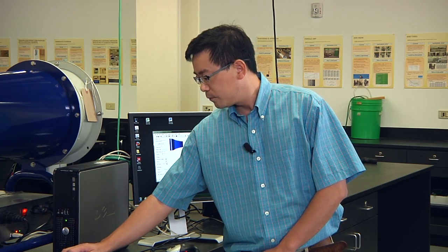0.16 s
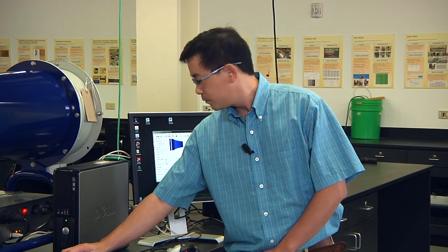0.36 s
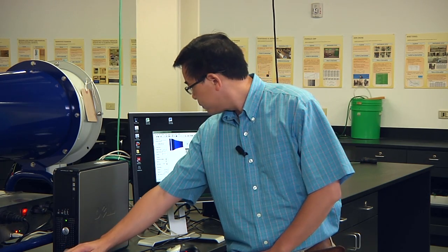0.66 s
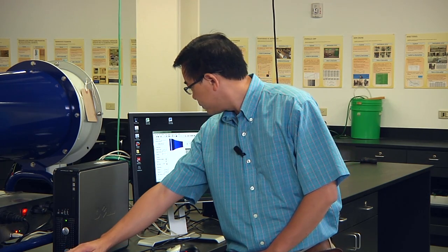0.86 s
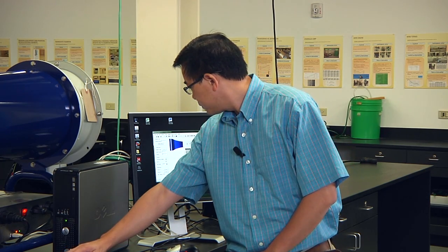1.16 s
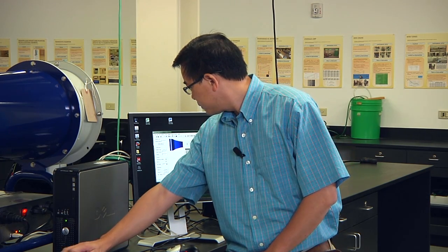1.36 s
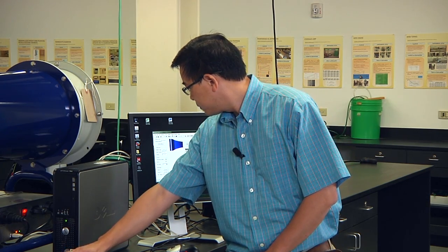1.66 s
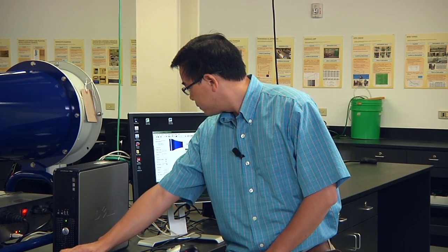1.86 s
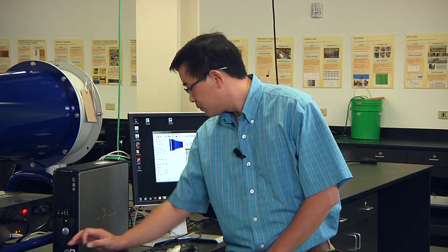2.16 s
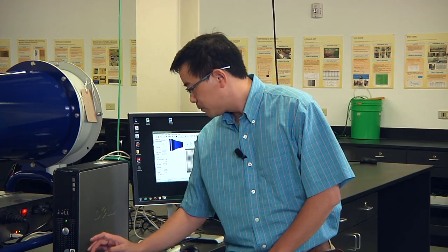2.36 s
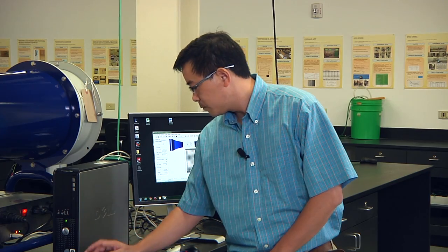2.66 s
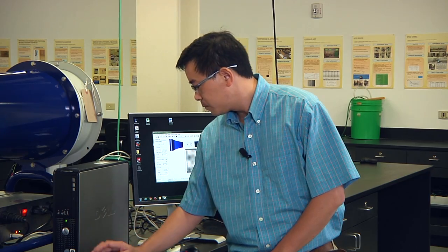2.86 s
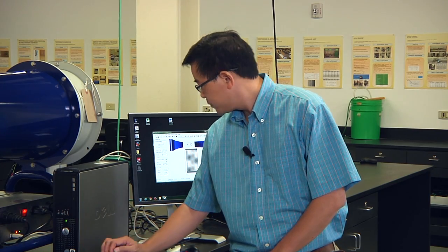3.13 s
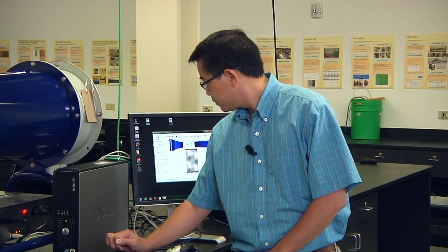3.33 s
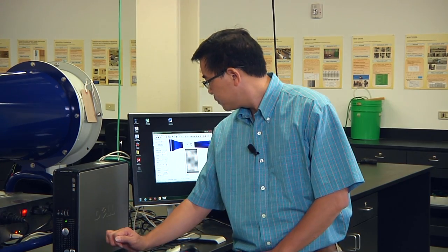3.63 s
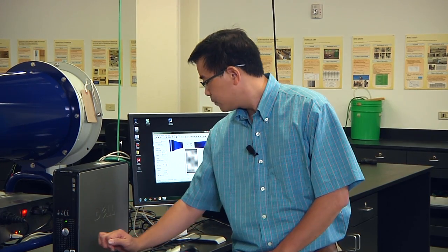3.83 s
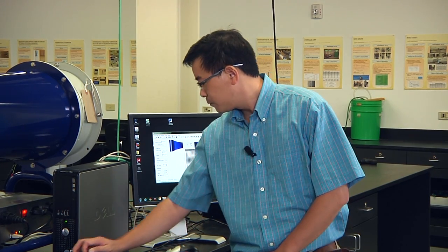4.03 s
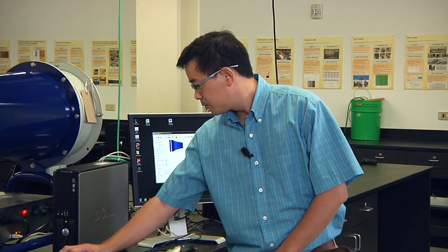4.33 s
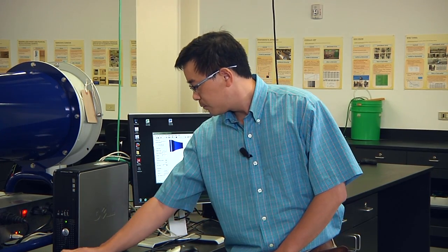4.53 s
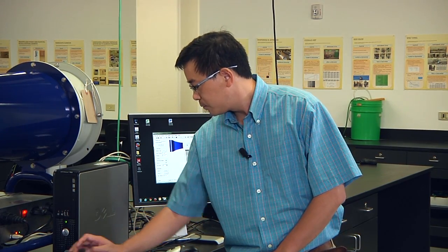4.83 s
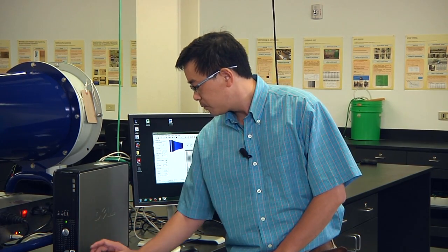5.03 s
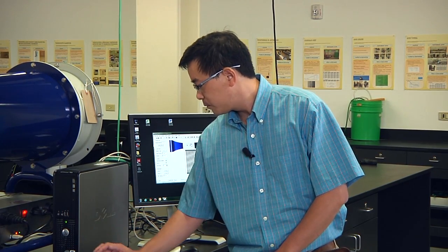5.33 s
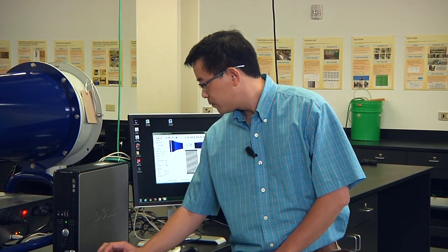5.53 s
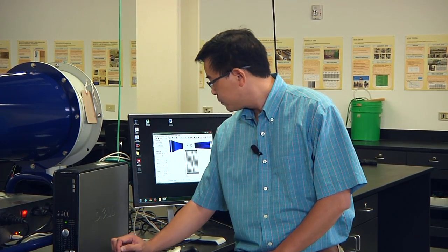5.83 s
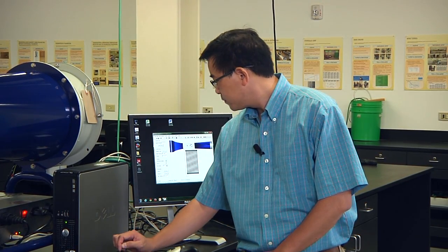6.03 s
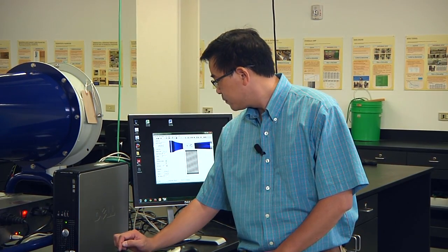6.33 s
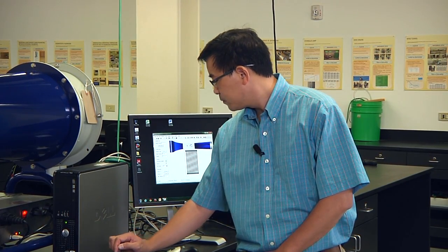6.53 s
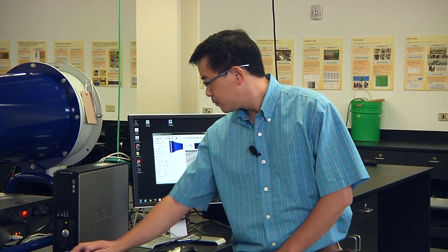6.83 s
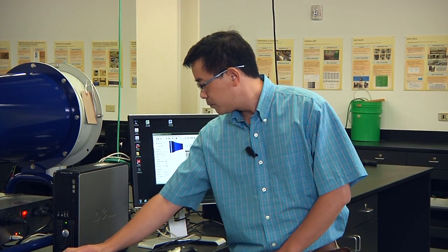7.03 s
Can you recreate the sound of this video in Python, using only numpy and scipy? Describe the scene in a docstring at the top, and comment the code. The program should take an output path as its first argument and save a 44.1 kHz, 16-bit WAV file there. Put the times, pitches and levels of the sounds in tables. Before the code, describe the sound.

A wind tunnel fan is already running fast in a laboratory, with rushing air, a low roar and a thin motor whine. From the start the whine glides downward and the rush eases until about 3.5 seconds. A low, throbbing boom in the duct swells around 2.5 to 3 seconds. The fan picks up slightly from 3.5 to 4 seconds, holds until 5, then winds down, booming again around 5.4 seconds. From about 6.2 seconds the motor moans faintly as the airflow fades toward steady room rumble, ending just after 7 seconds. A very faint, high electrical whistle persists throughout, shifting pitch occasionally. At the desk, a computer mouse wheel ticks in short runs at about 1.6 and 1.9 seconds, followed by four light plastic clicks between 2.8 and 3. More scrolling comes at 4.5 to 4.8 seconds, then three clicks around 5.3 to 5.5.

```python
"""A laboratory wind tunnel fan slows from high speed, picks up a little, then winds down.
Its turbulent air rushes and booms in two low duct resonances. Blade tones and motor whine follow
the shaft; the inverter whistles high above, and the slowing motor moans near the end.
At the desk a computer mouse clicks and scrolls, each snap ringing its shell, over steady room air."""
import sys
import numpy as np
from scipy import signal
from scipy.fft import rfft, irfft, next_fast_len
from scipy.io import wavfile
from scipy.ndimage import uniform_filter1d

SR = 44100
rng = np.random.default_rng(int(sys.argv[2]) if len(sys.argv) > 2 else 0)


def generate_wav(sig):
    """Save sig (samples, or channels by samples) to the path in sys.argv[1] as 16-bit PCM at SR."""
    pcm = np.round(np.clip(np.atleast_2d(sig).T, -1, 1) * 32767).astype(np.int16)
    wavfile.write(sys.argv[1], SR, pcm)


N = 317079
TIME_S = np.arange(N) / SR
SLOTS, BLADES, CRUISE_WHINE_HZ = 72, 4, 1660
FAST_HZ, SLOW_HZ, LOW_HZ = 14922, 14013, 7020  # inverter switching

# Growth with fan speed: cruise_gain_db, db_per_octave
RUSH_LAW, ROAR_LAW, HISS_LAW = (-48.5, 18), (-41, 19.7), (-64.5, 18.9)
DRONE_LAW, WHINE_LAW = (-41, 24.5), (-47, 11.8)

# Motor whine, SLOTS times the shaft rate: time_s, pitch_hz
WHINE_PITCH = [(0, 2635), (.25, 2570), (.45, 2430), (.92, 2275), (1.15, 2230), (1.42, 2105), (2.3, 1850),
               (3, 1595), (3.5, 1480), (4.1, 1658), (5.05, 1662), (5.4, 1600), (5.7, 1490), (6, 1345),
               (6.5, 1175), (7.19, 1010)]
# Fan tones: shaft_multiple, gain_db
FAN_TONES = [(4, 2), (7, 3.5)]
# Duct modes carrying the fan tones: centre_hz, width_hz, gain_per_pass_db
DUCT_MODES = [(111, 38, 1), (163.8, 5.7, 1.5), (231, 35, 0)]
# Whine partials: harmonic, gain_db
WHINE_PARTIALS = [(1, 6), (2, -1.5), (3, -5), (4, -11), (5, -11.5)]
# Motor housing modes: centre_hz, width_hz, gain_db
HOUSING_MODES = [(1647, 50, -26.5), (2396, 46, -26.5), (2630, 38, -30), (3230, 120, -46), (3700, 77, -34),
                 (4560, 160, -26), (5200, 120, -30), (5830, 250, -22.5), (6340, 160, -29), (6750, 150, -35),
                 (7230, 100, -26), (7770, 110, -27.5), (8400, 120, -29), (9015, 50, -26), (9800, 120, -23),
                 (10900, 200, -24), (11950, 100, -30)]
# Mid-band air rush: frequency_hz, relative_density_db
RUSH_SPECTRUM = [(240, -27), (400, -3.5), (450, -5.5), (560, -6.5), (690, -2), (800, -5.5), (1000, -8),
                 (1200, -10.5), (1450, -9.5), (1700, -14), (2000, -17), (2400, -24.5), (3200, -38.5),
                 (4500, -75)]
# Low air roar: frequency_hz, relative_density_db
ROAR_SPECTRUM = [(15, -44), (28, -15), (37, -3), (50, -28), (65, -19), (85, -0.5), (108, 3.5), (128, -8),
                 (150, 5), (178, -3.5), (195, -0.5), (230, 1), (265, -0.5), (300, -11.5), (380, -9.5),
                 (470, -26), (700, -50)]
# High air hiss: frequency_hz, relative_density_db
HISS_SPECTRUM = [(1200, -25), (2000, -1), (2600, 4.5), (3300, 1.5), (4000, -2.5), (4800, -0.5), (6000, -5),
                 (8500, -10), (9900, -6), (11500, -20), (15500, -24)]
# Tunnel wall rings: pitch_hz, width_hz, gain_db
WALL_MODES = [(318.4, 6.7, -11.5), (349.6, 15, -12), (690, 25.4, -7), (1090, 22, -14), (1238, 30, -18.5),
              (1451, 39, -15.5), (1626, 15, -22)]
# Slow boom envelope, highest with the blade tone near: time_s, gain_db
BOOM_ENVELOPE = [(0, -22), (.3, -5), (1.3, -7), (2.1, -4), (2.75, 4.5), (2.97, -4.5), (3.3, -1.5),
                 (3.85, -6), (3.93, 1), (4.87, 0.5), (5.08, -4.5), (5.3, 2.5), (5.65, -2.5), (5.83, -11),
                 (6.02, -9.5), (7.19, -23)]
# Boom flares, slowing blade tone close by: centre_s, length_s, gain_db
BOOM_FLARES = [(2.453, 0.1, 2.5), (2.813, 0.14, 6.5), (5.41, 0.11, 5), (5.603, 0.091, 6)]
# Inverter whistles: start_s, end_s, switching_hz, start_gain_db, end_gain_db, fuzz_db
WHISTLES = [(0, 1.3, FAST_HZ, -78, -86, -5), (1.3, 3.3, FAST_HZ, -87, -84, 0),
            (3.3, 3.98, FAST_HZ, -77, -77, 1), (3.98, 4.3, FAST_HZ, -85, -88, 4),
            (4.3, 4.93, SLOW_HZ, -85, -84, 4), (4.9, 6.08, FAST_HZ, -88, -85, 3),
            (6.09, 7.3, SLOW_HZ, -74, -81, 1), (6.09, 7.3, LOW_HZ, -81, -97, 11)]
# Sidebands of the switching tone: offset_shaft_multiple, gain_db
SIDEBANDS = [(7.2, -10), (14.4, -15), (22, -17), (28, -8)]
# Motor moans: start_s, end_s, pitch_hz, gain_db
MOANS = [(6.237, 6.482, 416, -46.5), (6.25, 6.75, 383.4, -54), (6.45, 7.055, 410, -58.5),
         (7.02, 7.225, 418, -56)]
# Button clicks: start_s, snap_peak_db, body_gain_db, treble_gain_db
CLICKS = [(2.7876, -45, 2, -1), (2.8362, -53, 2, -10), (2.8744, -49.5, -2, -15), (3.0022, -40.5, -3.5, 1),
          (5.267, -44, -3, -29), (5.3595, -48, -6, -19), (5.4792, -43, -8.5, 2)]
# Scroll wheel strokes: start_s, end_s, gain_db
SCROLLS = [(1.584, 1.70, -41.5), (1.869, 1.95, -46.5), (4.52, 4.61, -42.5), (4.665, 4.78, -43.5)]
# Plastic mouse shell modes: pitch_hz, gain_db, t60_s
SHELL_MODES = [(3170, -3, 0.035), (3720, 7, 0.012), (4520, 0, 0.035), (5500, 3.5, 0.013),
               (6640, -14.5, 0.014), (7640, -5, .012), (8680, -3, 0.027)]
# Room air: frequency_hz, relative_density_db
ROOM_SPECTRUM = [(18, 7), (28, 26), (37, 36.5), (50, 27.5), (72, 39), (110, 16.5), (400, 19.5),
                 (1000, 11.5), (1450, 12), (2100, -25), (3000, -10), (4200, -8.5), (4900, -4), (5280, 6),
                 (5700, -5), (8500, -9), (10000, -5), (10700, -5), (11400, -8.5), (15500, -10)]


def fan():
    """Blade tones and motor slot whine, locked to the shaft, glide through duct and housing modes."""
    whine_hz = curve(WHINE_PITCH)
    shaft_hz = whine_hz / SLOTS
    blades, whine = np.zeros(N), np.zeros(N)
    for multiple, db in FAN_TONES:
        hz = multiple * shaft_hz
        duct_gain = mode_gain(DUCT_MODES, hz) ** 2  # two passes: steep flanks
        blades += amp(db) * duct_gain * tone(hz, 0.88 + 0.54 * flutter(2.35))
    for harmonic, db in WHINE_PARTIALS:
        hz = harmonic * whine_hz
        whine += amp(db) * mode_gain(HOUSING_MODES, hz) * tone(hz, 0.45 + 1.3 * flutter(49))
    return speed_gain(RUSH_LAW) * blades + speed_gain(WHINE_LAW) * whine


def airflow():
    """Tunnel turbulence: rush with the wall ringing in it, roar and hiss."""
    wall = sum(amp(db) * tone(hz, flutter(width_hz)) for hz, width_hz, db in WALL_MODES)
    rush = speed_gain(RUSH_LAW) * (amp(-0.5) * noise(RUSH_SPECTRUM) + wall)
    roar = speed_gain(ROAR_LAW) * noise(ROAR_SPECTRUM)
    hiss = speed_gain(HISS_LAW) * noise(HISS_SPECTRUM)
    return rush + roar + hiss


def duct(boom_hz=95.6, drone_hz=162.8, pull_share=0.65, pull_range_hz=23.2):
    """Two duct resonances throb in the flow; a nearby blade tone pulls the lower one's pitch."""
    offset_hz = BLADES * curve(WHINE_PITCH) / SLOTS - boom_hz
    pulled_hz = boom_hz + pull_share * offset_hz * np.exp(-(offset_hz / pull_range_hz) ** 2)
    strength = throb(depth=0.65, rate_hz=15.6)
    for centre_s, length_s, db in BOOM_FLARES:
        age = (TIME_S - centre_s) / length_s
        flare = (amp(db) - 1) * np.exp(-(2 * age) ** 2)
        sag_db = -2.5 * np.exp(-(3.2 * (age - 0.83)) ** 2)  # boom falls out of step with the blades
        strength = (strength + flare) * amp(sag_db)
    boom = strength * resonance(pulled_hz, jitter_hz=4, roughness=0.17)
    drone = resonance(drone_hz, jitter_hz=5.5, roughness=0.22) * throb(depth=0.8, rate_hz=15.8)
    return amp(-30.5 + curve(BOOM_ENVELOPE)) * boom + speed_gain(DRONE_LAW) * drone


def resonance(hz, jitter_hz, roughness):
    """Self-sustained resonance; turbulence jostles its pitch and, slightly, its strength."""
    jostled_hz = hz + jitter_hz * flutter(23).real
    waver = 1 + roughness * flutter(2 * jitter_hz)
    return tone(jostled_hz, waver) / np.sqrt(1 + roughness ** 2)


def inverter(fade_s=0.053):
    """The motor drive hops between switching frequencies; sidebands close in as the shaft slows."""
    out = np.zeros(N)
    shaft_hz = curve(WHINE_PITCH) / SLOTS
    sidebands = sum(np.sqrt(2) * amp(db + 1) * tone(multiple * shaft_hz, 0.8 + 0.6 * flutter(15))
                    for multiple, db in SIDEBANDS)
    for start_s, end_s, hz, start_db, end_db, fuzz_db in WHISTLES:
        gate = np.clip(np.minimum(TIME_S - start_s, end_s - TIME_S) / fade_s + 0.5, 0, 1)
        gain = amp(np.interp(TIME_S, [start_s, end_s], [start_db, end_db]))
        waver = 0.67 + 0.88 * flutter(35) + amp(fuzz_db) * flutter(380)
        out += gate * gain * tone(hz, waver + sidebands)
    return amp(3) * out


def motor_moans():
    """The motor housing sounds briefly as the speed falls."""
    out = np.zeros(N)
    for start_s, end_s, hz, db in MOANS:
        swell = np.sin(np.pi * np.clip((TIME_S - start_s) / (end_s - start_s), 0, 1))
        out += amp(db) * swell * tone(hz, 0.71 + 0.4 * flutter(48))
    return out


def mouse(rebound_s=0.0089, notch_gap_s=0.025, jitter_s=0.005, spread_db=2):
    """Buttons ring the hollow body and rebound more weakly; wheel notches tick in short runs."""
    out = np.zeros(N)
    t = np.arange(SR // 10) / SR
    body = amp(-60 * t / 0.048) * (np.sin(2 * np.pi * 1750 * t) + 0.61 * np.sin(2 * np.pi * 1890 * t))
    for start_s, db, body_db, treble_db in CLICKS:
        press = snap(t, treble_db, crack_db=-3, crack_s=0.0036) + amp(body_db + 5.5) * body
        rebound = snap(t, treble_db=-20, crack_db=9, crack_s=0.0047)
        add(out, start_s, amp(db) * press)
        add(out, start_s + rebound_s, amp(db - 2) * rebound)
    for start_s, end_s, db in SCROLLS:
        for notch_s in np.arange(start_s, end_s, notch_gap_s):
            late, strong = rng.uniform(-1, 1, 2)
            notch = amp(-3) * snap(t, treble_db=-12, crack_db=11.5, crack_s=0.0019) + amp(-7) * body
            add(out, notch_s + jitter_s * late, amp(db + spread_db * strong) * notch)
    return out


def snap(t, treble_db, crack_db, crack_s, attack_s=0.0005, split_hz=5200):
    """Switch snap, peak 1: a crack, the shell's ring and a faint tail off the desk."""
    ring = np.zeros(len(t))
    for hz, db, t60_s in SHELL_MODES:
        detune, phase = 1 + 0.11 * (rng.random() - 0.5), rng.random()
        ring += amp(db - 60 * t / t60_s) * np.sin(2 * np.pi * (hz * detune * t + phase))
    crack = butter(rng.standard_normal(len(t)), 4, [2000, 9500], "band")
    decay = np.exp(-t / crack_s) + amp(-12) * np.exp(-t / 0.026)
    sound = (ring + amp(crack_db) * crack * decay) * (1 - np.exp(-t / attack_s))
    dull, bright = butter(sound, 2, split_hz, "low"), butter(sound, 2, split_hz, "high")
    sound = dull - amp(treble_db + 8) * bright  # minus: bands in phase at the split
    return sound / abs(sound).max()


def room_air(level_db=-51.5):
    """Steady background noise, mostly low rumble."""
    return amp(level_db) * noise(ROOM_SPECTRUM)


def speed_gain(law, lead_s=0.17):
    """Gain from fan speed and acceleration: blades work harder while speeding up."""
    cruise_gain_db, db_per_octave = law
    speed_oct = np.log2(curve(WHINE_PITCH) / CRUISE_WHINE_HZ)
    accel_oct_per_s = uniform_filter1d(np.gradient(speed_oct, TIME_S), size=SR // 3)
    return amp(cruise_gain_db + db_per_octave * (speed_oct + lead_s * accel_oct_per_s))


def mode_gain(modes, hz, floor_db=-30.5):
    """A gliding tone swells and fades as it crosses each mode."""
    power = sum(amp(db) ** 2 / (1 + (2 * (hz - centre_hz) / width_hz) ** 2)
                for centre_hz, width_hz, db in modes)
    return np.sqrt(power + amp(floor_db) ** 2)


def flutter(width_hz):
    """Low-passed complex noise, unit power: wandering strength and phase."""
    pole = np.exp(-np.pi * width_hz * np.sqrt(2) / SR)
    white = rng.standard_normal(N + SR) + 1j * rng.standard_normal(N + SR)
    slow = signal.lfilter([(1 - pole) ** 2], [1, -2 * pole, pole * pole], white)[SR:]
    return slow / np.sqrt(np.mean(abs(slow) ** 2))


def throb(depth, rate_hz):
    """Uneven swell and sag, unit power."""
    return abs(1 + depth * flutter(rate_hz)) / np.sqrt(1 + depth ** 2)


def tone(hz, waver):
    """Unit-power tone following hz, times a complex waver."""
    cycles = np.cumsum(hz * np.ones(N)) / SR
    return np.sqrt(2) * (waver * np.exp(2j * np.pi * cycles)).real


def noise(spectrum):
    """Unit-power noise with the given spectral shape."""
    size = next_fast_len(N)
    hz, db = np.transpose(spectrum)
    gain = amp(np.interp(np.log(np.fft.rfftfreq(size, 1 / SR) + 1), np.log(hz), db))
    shaped = irfft(rfft(rng.standard_normal(size)) * gain, size)[:N]
    return shaped / np.sqrt(np.mean(shaped ** 2))


def butter(sound, order, hz, kind):
    return signal.sosfilt(signal.butter(order, hz, kind, fs=SR, output="sos"), sound)


def amp(db):
    return 10 ** (np.asarray(db) / 20)


def curve(rows):
    return np.interp(TIME_S, *np.transpose(rows))


def add(mix, start_s, sound):
    part = mix[round(start_s * SR):][:len(sound)]
    part += sound[:len(part)]


def scene():
    """Tunnel, mouse and room air, mono."""
    tunnel = airflow() + duct() + fan() + inverter() + motor_moans()
    return (tunnel + mouse() + room_air())[None]


def record(dry):
    """Steep low-pass on the top treble."""
    lowpass = signal.firwin(801, cutoff=15690, window=("kaiser", 9), fs=SR)
    return signal.oaconvolve(dry, lowpass[None], "same")


dry = scene()
out = record(dry)
generate_wav(out)
```